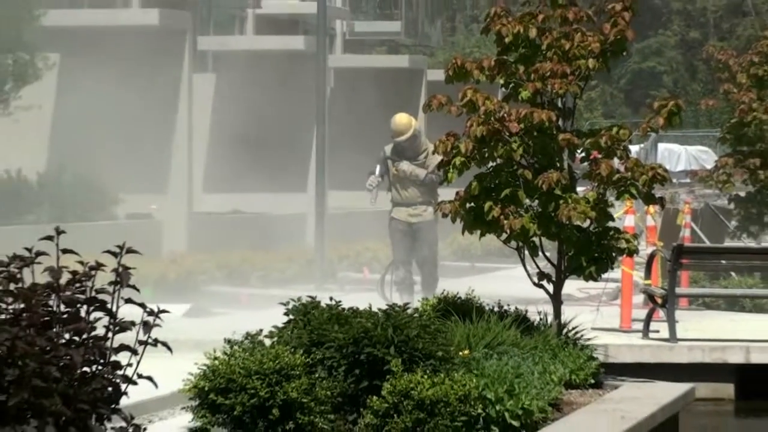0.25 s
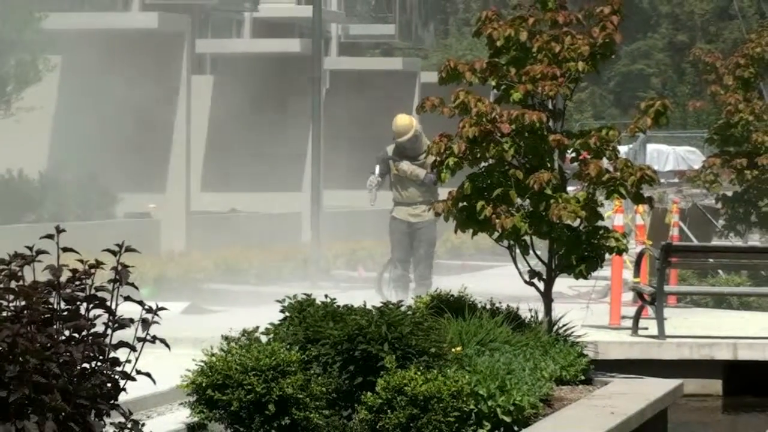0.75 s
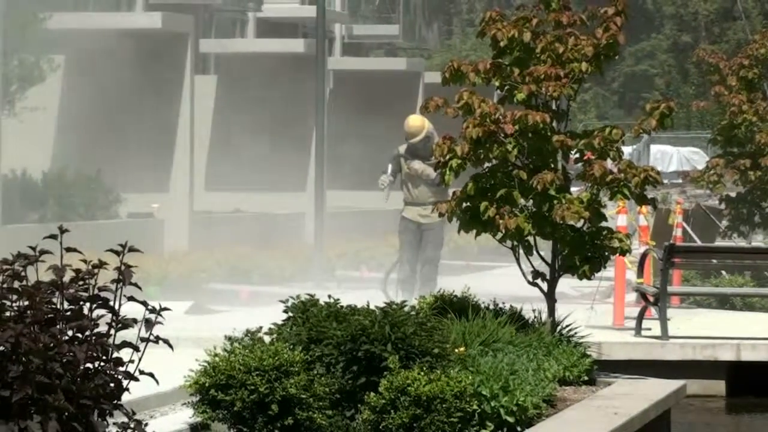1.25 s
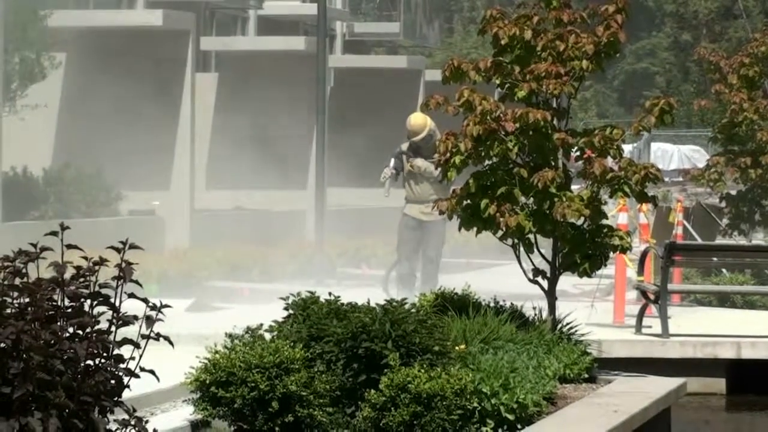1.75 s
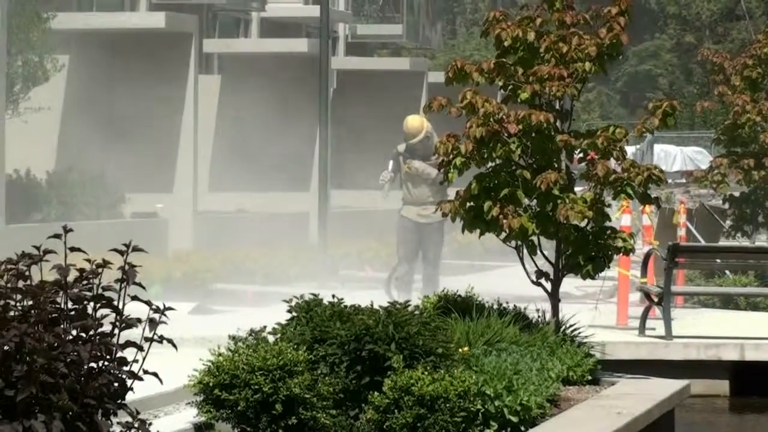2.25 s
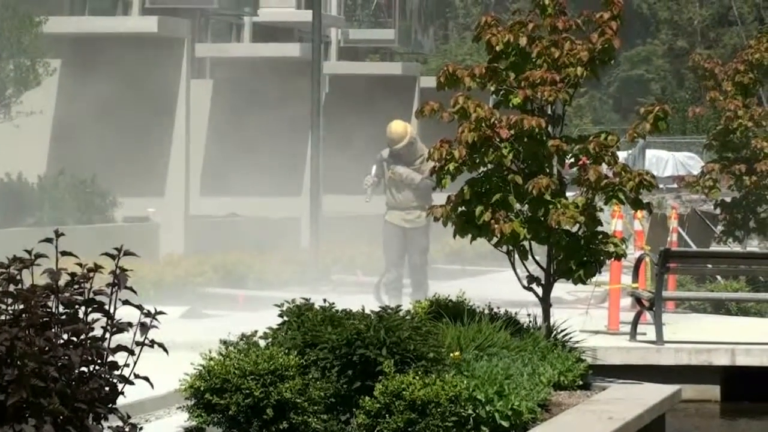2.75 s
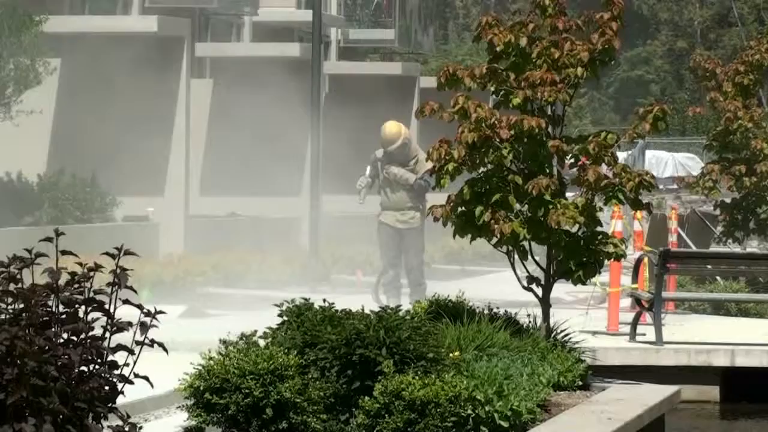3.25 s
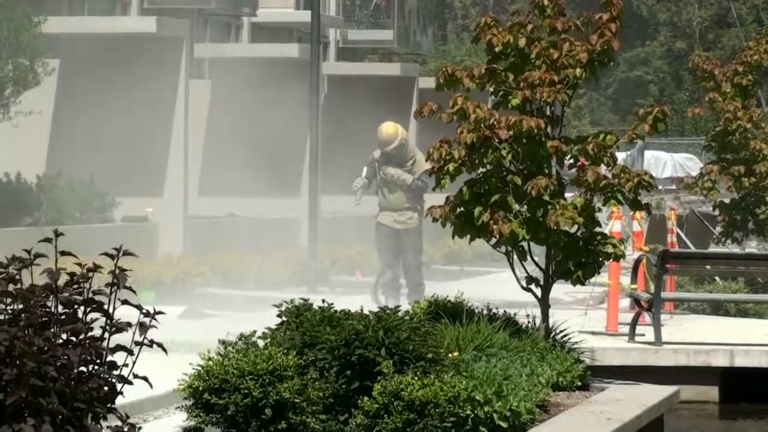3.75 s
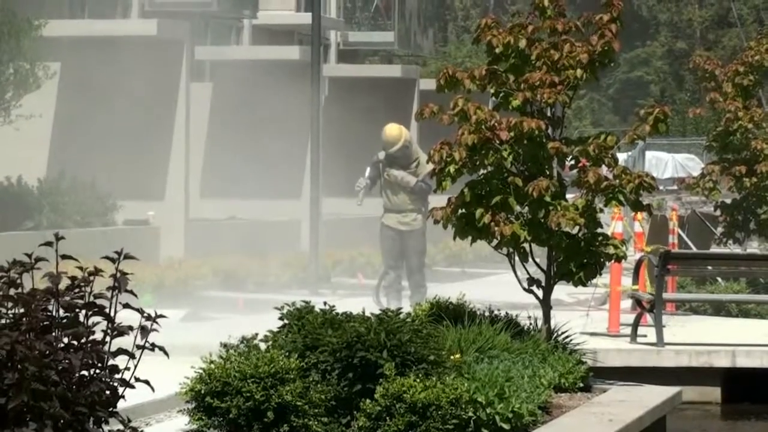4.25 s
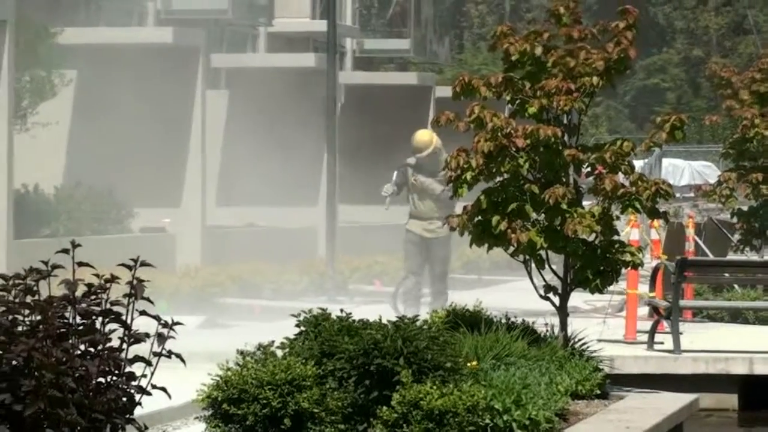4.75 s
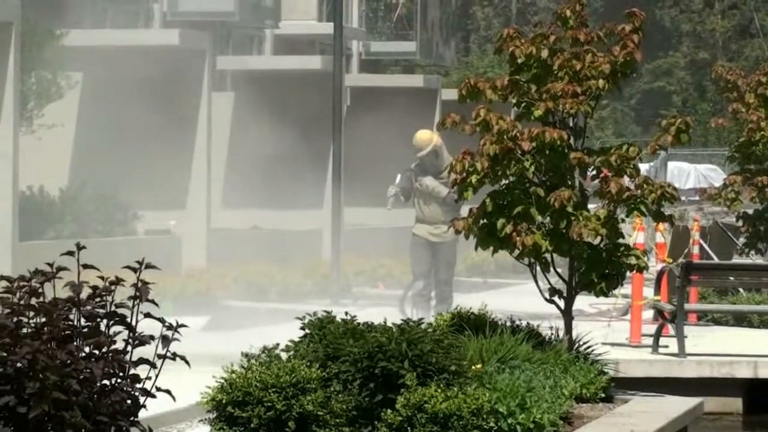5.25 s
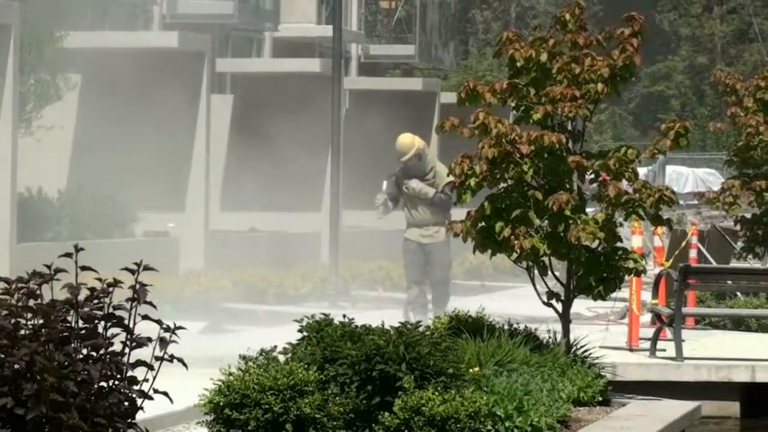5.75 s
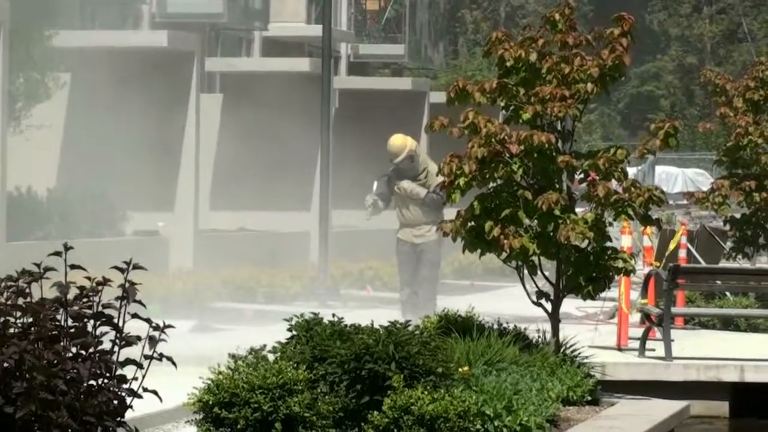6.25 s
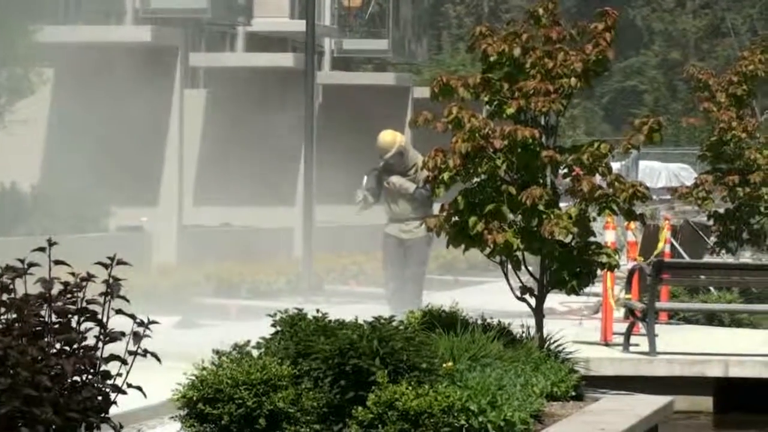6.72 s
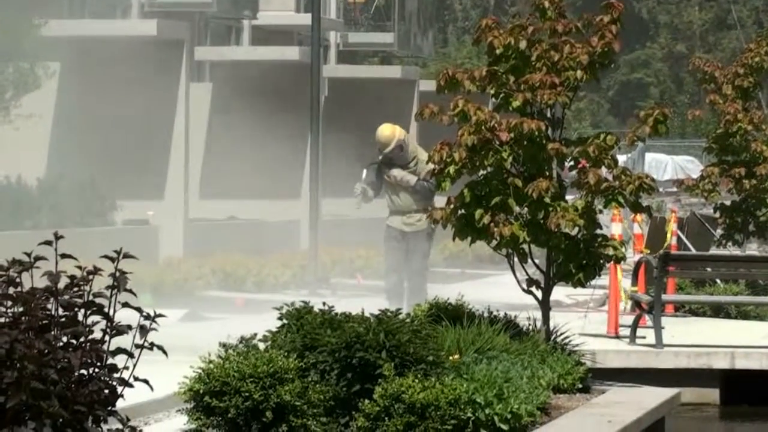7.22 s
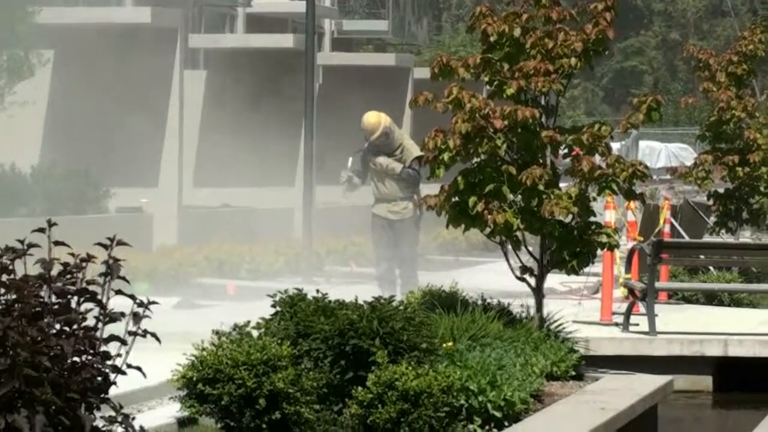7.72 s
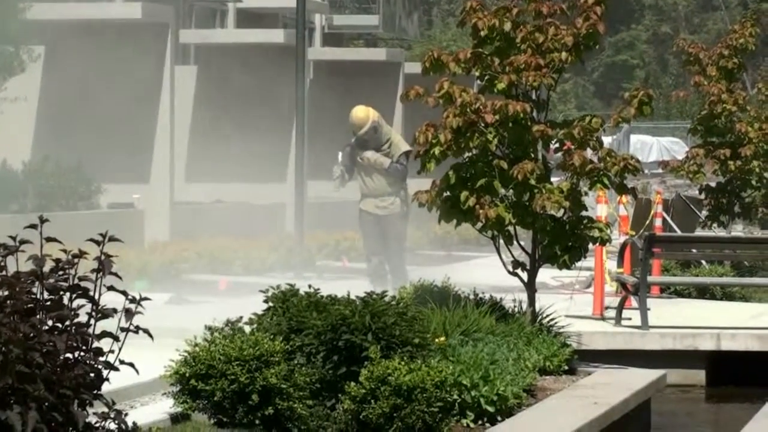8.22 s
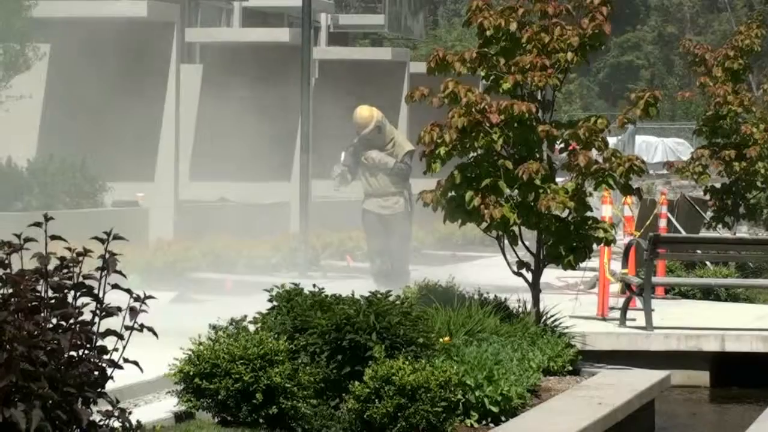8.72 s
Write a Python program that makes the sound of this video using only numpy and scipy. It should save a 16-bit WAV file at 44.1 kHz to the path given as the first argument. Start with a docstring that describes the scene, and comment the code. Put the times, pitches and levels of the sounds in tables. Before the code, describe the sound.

Continuous harsh hiss of compressed air and sand in a paved yard, fluttering slightly, with low traffic and compressor hum buried far underneath.

```python
"""From the start a blasting nozzle sprays sand on concrete in a paved yard: bands of noise make the air roar and the sand hiss.
As the nozzle swings toward the microphones the hiss brightens and the lower roar thins; short echoes are delayed copies.
Traffic rumbles as low noise and a compressor hums as a wavering sine, both throughout.
From about four seconds an engine revs up far off as two harmonics, joined by low tones that swell and fade
and two soft bumps of low noise."""
import sys
import numpy as np
from scipy import signal
from scipy.fft import rfft, irfft, next_fast_len
from scipy.io import wavfile
from scipy.ndimage import uniform_filter1d, map_coordinates

SR = 44100
rng = np.random.default_rng(int(sys.argv[2]) if len(sys.argv) > 2 else 0)


def unload_audio(sound):
    """Save the sound as a 16-bit wav file, at the path given as the first command line argument."""
    columns = np.transpose(np.atleast_2d(sound))
    # keep every value between -1 and 1, then stretch to whole-number steps
    steps = np.round(np.clip(columns, -1, 1) * 32767)
    wavfile.write(sys.argv[1], SR, steps.astype(np.int16))


N = 396018  # samples


def amp(db):
    """Decibel law: twenty decibels for each factor of ten in amplitude."""
    return 10 ** (np.asarray(db) / 20)


def unit(x):
    """Normalisation to a root mean square of 1."""
    return x / np.sqrt(np.mean(x ** 2) + 1e-20)


def along(points, hz):
    """Linear interpolation of (Hz, value) points on a logarithmic frequency axis."""
    f, v = np.transpose(points)
    return np.interp(np.log(hz + 1), np.log(f + 1), v)


def curves(rows):
    """Linear interpolation in time: one value per sample for each column after the time."""
    s, *columns = np.transpose(rows)
    t = np.arange(N) / SR
    return [np.interp(t, s, column) for column in columns]


def wobble(rate):
    """Band-limited random modulation: a smooth curve through random knots, rate of them a second."""
    knots = rng.standard_normal(int(N * rate / SR) + 4)
    return map_coordinates(knots, [np.arange(N) * rate / SR])


def filtered(x, response):
    """Linear filtering: the spectrum of x times a complex response of frequency."""
    m = next_fast_len(N + 8192)
    return irfft(rfft(x, m) * response(np.fft.rfftfreq(m, 1 / SR)), m)[..., :N]


def patches(shape, db, tall, long):
    """Random intensity fluctuation: a gain field smoothed over tall frequency bins and long frames."""
    field = rng.standard_normal(shape)
    field = uniform_filter1d(field, size=tall, axis=0)
    field = uniform_filter1d(field, size=long, axis=1)
    return amp(db * unit(field))


# Coherence of the two ports where direct and scattered levels agree.
# Each row: frequency in Hz, left-right likeness (0 to 1).
LIKENESS = [(25, 0.77), (60, 0.94), (130, 0.968), (290, 0.95), (640, 0.876), (1400, 0.85), (2100, 0.94),
            (3100, 0.83), (6800, 0.83), (11200, 0.79), (11400, 0.94), (11700, 1), (15000, 1)]


def rush(layers, patchy_db, comb_db, size):
    """Incoherent sources add in power: layers of (spectrum, direct dB, scattered dB) shape two independent noises."""
    hz, t, noise = signal.stft(rng.standard_normal((2, N)), SR, nperseg=size)
    at = np.clip((t * SR).astype(int), 0, N - 1)
    power = 0
    for spectrum, *db in layers:
        shape = unit(amp(along(spectrum, hz)))[:, None]
        power = power + shape ** 2 * amp(np.array(db)[:, None, at]) ** 2
    # the scattered part enters the ports with opposite signs, so this angle sets their likeness
    turn = np.arccos(np.clip(along(LIKENESS, hz), 0, 1)) / 2
    shares = np.array([np.cos(turn), np.sin(turn)])[..., None]
    eddies = patches(noise.shape[1:], patchy_db, tall=10, long=3)
    # interference from far walls: narrow, long-lasting ridges
    ridges = patches(noise.shape[1:], comb_db, tall=1, long=24)
    shaped = noise * np.sqrt(power) * shares * eddies * ridges
    return signal.istft(shaped, SR, nperseg=size)[1][:, :N]


# Early reflections from paving and walls. Each row: delay in seconds, low-frequency level in dB re the direct sound.
REFLECTIONS = [(.0013, -27.5), (.00156, -27.5), (.0022, -26.5), (.0042, -28.5), (.0064, -24.5)]


def yard(x):
    """Early reflection: weak copies arrive milliseconds late, their treble scattered away by rough faces."""
    def response(hz):
        dull = 1 / (1 + (hz / 2500) ** 2)
        copies = sum(amp(db) * np.exp(-2j * np.pi * hz * s) for s, db in REFLECTIONS)
        return 1 + dull * copies
    return filtered(x, response)


# Strength of jet and sand. Each row: time in seconds, air roar level in dB, sand hiss level in dB.
BLAST_LEVELS = [(0.0, -24.25, -23.75), (0.12, -23.5, -22.75), (0.25, -22.75, -26.5), (0.38, -23.0, -23.75),
                (1.12, -23.0, -27.0), (1.25, -21.25, -24.5), (1.38, -25.25, -22.75), (1.88, -24.0, -24.0),
                (2.0, -24.0, -22.25), (2.12, -24.25, -24.75), (2.25, -24.5, -22.25), (2.75, -23.0, -23.5),
                (2.88, -24.0, -22.5), (3.12, -23.0, -24.5), (3.25, -24.25, -22.0), (3.5, -26.0, -21.75),
                (4.62, -24.5, -22.5), (5.12, -23.0, -26.75), (5.25, -22.75, -23.5), (5.62, -25.25, -22.0),
                (5.75, -24.25, -23.0), (6.75, -23.0, -25.75), (7.62, -23.75, -26.0), (7.75, -26.5, -24.5),
                (7.88, -24.25, -25.0), (8.25, -24.75, -26.25), (8.38, -24.5, -24.5), (8.98, -24.25, -26.0)]
# Slow part of two layers' levels. Each row: time in seconds, nozzle ring in dB, upper roar in dB.
SLOW_LEVELS = [(0.0, -24.5, -26.5), (0.5, -23.25, -23.5), (1.75, -25.0, -24.5), (2.0, -23.75, -23.5),
               (3.0, -26.5, -26.0), (3.5, -23.25, -24.5), (4.0, -26.25, -24.75), (4.75, -25.5, -23.25),
               (5.25, -25.0, -23.25), (6.75, -25.75, -25.0), (8.98, -24.0, -24.5)]
# Swing of the treble beam between the ports. Each row: time in seconds, left-right difference in dB.
BEAM_SWING = [(0.0, 0.7), (0.75, -0.3), (1.25, 0.4), (2.25, -0.1), (5.25, 0.9), (6.5, 0.1), (7.0, 0.6),
              (7.75, -1.3), (8.98, -1.5)]
# Spectral shapes of the low roar, air roar, nozzle ring, upper roar and sand hiss.
# Each row: frequency in Hz, relative density in dB per Hz.
LOW_SHAPE = [(400, -38), (540, -23.5), (600, -8), (650, -3.5), (860, -3.5), (920, -5), (1200, 0.5),
             (1300, -0.5), (1500, -1.5), (2200, -26)]
ROAR_SHAPE = [(900, -37), (1400, -15.5), (1700, -7), (2200, -5), (2750, -1.5), (2950, -2), (3200, -2),
              (3600, -2), (4100, -4.5), (4600, -39), (5500, -51)]
RING_SHAPE = [(3300, -31), (4100, -5.5), (4500, -0.5), (4800, -3), (5100, -2), (5500, -8.5), (6000, -17.5),
              (7000, -40)]
UPPER_SHAPE = [(4500, -40), (5500, -2.5), (6000, -3), (6300, -2), (7100, -2.5), (7400, -5), (8000, -12),
               (9500, -33)]
SAND_SHAPE = [(6000, -43.5), (7400, -4), (8200, -0.5), (9300, -2), (9600, -2), (11100, -3.5), (11400, -2.5),
              (12600, -5.5), (12900, -11), (13200, -8.5), (13600, -10.5), (14000, -11), (14500, -25),
              (15300, -23), (15750, -32)]
LOW_DB = -36.9  # mean level of the low roar, before drift
LOW_JET, RING_JET, UPPER_JET = .35, .2, .5  # dB gained per dB of air roar
LOW_AIM, RING_AIM, UPPER_AIM = -.65, -.5, .15  # dB gained per dB of sand hiss
DRIFT_DB, DRIFT_PER_S = .45, 5  # separate wander of the low, ring and upper layers: depth, knots a second


def nozzle():
    """Turbulent jet noise roars, countless grain impacts merge into hiss, and uneven sand feed makes both flutter."""
    roar, sand = curves(BLAST_LEVELS)
    ring, upper = curves(SLOW_LEVELS)
    jet = roar - roar.mean()
    aim = sand - sand.mean()

    def drift():
        """Independent modulation: a slow random wander in dB."""
        return DRIFT_DB * wobble(DRIFT_PER_S)

    low = LOW_DB + LOW_JET * jet + LOW_AIM * aim + drift()
    ring = ring + RING_JET * jet + RING_AIM * aim + drift()
    upper = upper + UPPER_JET * jet + UPPER_AIM * aim + drift()
    feed = wobble(14)

    def calm(db, share, tie):
        """Directivity: treble leaves as a beam, so its scatter follows the aim less and the low roar more."""
        return db.mean() + share * (db - db.mean()) + tie * (low - low.mean())

    layers = [(LOW_SHAPE, low, low),
              (ROAR_SHAPE, roar, calm(roar, share=.62, tie=.3)),
              (RING_SHAPE, ring, calm(ring, share=.7, tie=.3)),
              (UPPER_SHAPE, upper, calm(upper, share=.4, tie=.4)),
              (SAND_SHAPE, sand + .47 * wobble(16), calm(sand, share=.4, tie=.4))]
    blast = rush(layers, patchy_db=.4, comb_db=1.9, size=2048)
    flutter = amp(.3 * feed + .25 * wobble(7))
    direct, scattered = flutter * blast
    # the beam swings between the two ports
    treble = filtered(direct, lambda hz: np.clip((hz - 3600) / 1800, 0, 1) * (hz < 11500))
    pan = np.tanh(curves(BEAM_SWING)[0] * np.log(10) / 40)  # dB difference to side share
    side = scattered + treble * pan
    return yard(np.array([direct + side, direct - side]))


# Course of the traffic. Each row: time in seconds, rumble level in dB.
TRAFFIC_LEVELS = [(0, -47.5), (.5, -49.5), (1.6, -51.5), (3, -50.8), (3.5, -52), (5.2, -49.3), (5.55, -52),
                  (7.25, -46.5), (7.8, -47.8), (8.98, -46.3)]
# Spectral shapes of the rumble, the deep rumble and the tyres.
# Each row: frequency in Hz, relative density in dB per Hz.
RUMBLE_SHAPE = [(90, -27), (160, 0), (220, -1), (300, 0.5), (370, -1), (430, -8), (600, -51.5)]
DEEP_SHAPE = [(15, -30), (30, -11), (50, -15), (80, 1.5), (130, -2.5), (200, -14), (300, -45)]
TYRE_SHAPE = [(330, -30), (440, -6.5), (500, -0.5), (560, -0.5), (620, -5.5), (800, -36)]
DEEP_DB, TYRE_DB = -10.5, -5  # dB re the mean rumble
DEEP_GROWS, TYRE_GROWS = 1.3, 1.3  # dB per dB of rumble swell


def traffic():
    """Superposition of many far sources: tyres and exhausts blend into slow rumbles that swell together."""
    rumble, = curves(TRAFFIC_LEVELS)
    mean = rumble.mean()
    swell = rumble - mean
    deep = mean + DEEP_DB + DEEP_GROWS * swell + 1.5 * wobble(3)
    tyres = mean + TYRE_DB + TYRE_GROWS * swell
    layers = [(RUMBLE_SHAPE, rumble, rumble), (DEEP_SHAPE, deep, deep), (TYRE_SHAPE, tyres, tyres)]
    noise = rush(layers, patchy_db=.5, comb_db=1.6, size=4096)
    direct, scattered = amp(.59 * wobble(9)) * noise
    return np.array([direct + scattered, direct - scattered])


# Compressor tone. Each row: mean frequency in Hz, level in dB before a fixed lift.
HUM_TONE = [(59.2, -60.5)]


def compressor():
    """Periodic vibration radiates a hum: one sine with slight amplitude and frequency modulation."""
    hz, db = HUM_TONE[0]
    level = amp(db + 2.5 + 1.2 * wobble(4))
    phase = 2 * np.pi * np.cumsum(hz + .35 * wobble(3)) / SR
    return level * np.sin(phase)


# Revving engine. Each row: time in seconds, firing rate in Hz, first-order level in dB and
# second-order level in dB, both before fixed lifts.
ENGINE_COURSE = [(4.2, 70, -74, -75), (4.8, 75, -64, -70), (5.3, 79.33, -65, -68), (5.9, 82.16, -70, -62),
                 (6.6, 85.8, -60, -66), (7.2, 91.2, -57, -58), (7.7, 96.14, -60, -66),
                 (8.2, 98.5, -66, -64), (8.6, 99.35, -62, -55), (8.98, 100.1, -62, -58)]


def engine():
    """Harmonic series of periodic firing: the first two orders climb together in pitch."""
    rate_hz, first_db, second_db = curves(ENGINE_COURSE)
    turn = 2 * np.pi * np.cumsum(rate_hz + .6 * wobble(6)) / SR
    # fades in over the 0.3 s before the first row
    fade = np.clip((np.arange(N) / SR - ENGINE_COURSE[0][0]) / .3 + 1, 0, 1)
    orders = amp(first_db + 4) * np.sin(turn) + amp(second_db + 3) * np.sin(2 * turn)
    return fade * amp(1.2 * wobble(8.8)) * orders


# Short tones. Each row: centre in seconds, mean pitch in Hz, rms level at the centre in dB,
# Gaussian half length in seconds, width of the pitch wander in Hz.
BOOM_TONES = [(4.27, 305, -44, .012, 60), (4.36, 293, -45, .035, 6.4), (4.36, 588, -50, .03, 10),
              (4.673, 297, -49, 0.018, 10.3), (6.948, 548, -45.5, .025, 20), (7.044, 523, -47, .025, 20),
              (7.16, 496, -44, .03, 20), (7.27, 290, -46.5, .025, 8), (7.301, 560, -49, .03, 27.8),
              (7.54, 117, -47, .07, 4.65), (8.83, 117, -46, 0.051, 4), (8.93, 155, -44.5, .04, 4)]


def booms():
    """Frequency-modulated tone bursts: Gaussian envelopes swell and fade over a slightly unsteady pitch."""
    out, t = np.zeros(N), np.arange(N) / SR
    for s, hz, db, half, width_hz in BOOM_TONES:
        swell = np.exp(-((t - s) / half) ** 2 / 2)
        phase = 2 * np.pi * np.cumsum(hz + width_hz / 2 * wobble(25)) / SR
        out += np.sqrt(2) * amp(db) * swell * np.sin(phase)
    return out


# Dull bumps. Each row: centre in seconds, rms level at the centre in dB, Gaussian half length in seconds.
BUMPS = [(4.28, -44, .02), (4.36, -47, .04)]
# Spectral shape of the bumps. Each row: frequency in Hz, relative density in dB per Hz.
BUMP_SHAPE = [(120, -30), (190, -3), (300, 0), (400, -2), (480, -14), (700, -40)]


def thuds():
    """Band-limited noise bursts: Gaussian puffs of low noise sound as soft dull bumps."""
    t = np.arange(N) / SR
    swell = sum(amp(db) * np.exp(-((t - s) / half) ** 2 / 2) for s, db, half in BUMPS)
    noise = filtered(rng.standard_normal(N), lambda hz: amp(along(BUMP_SHAPE, hz)))
    return swell * unit(noise)


def scene():
    """Superposition, with an arrival-time difference: machines to one side reach the right port 26 samples later."""
    machines = compressor() + engine()
    late = np.pad(machines, (26, 0))[:N]
    return nozzle() + traffic() + np.array([machines, late]) + booms() + thuds()


# Level balance of the ports. Each row: frequency in Hz, left-right difference in dB.
PORT_BALANCE = [(60, 0), (400, -0.2), (900, -0.6), (1500, -0.5), (3200, 1.7), (4500, 0.5), (7500, -0.7),
                (9400, -0.5), (11000, -1), (11800, 0)]
# Phase of the ports. Each row: frequency in Hz, lead of the left port in radians.
PORT_LEAD = [(0, -0.021), (3190, 0.0082), (6030, -0.23), (9220, 0.012), (9560, -0.2), (11000, -0.3),
             (11500, -0.0), (15500, 0.0)]
TOP_HZ = 15750  # band limit


def record(dry):
    """Interchannel level and phase difference: each port takes half of it, and a band limit cuts the top."""
    half = np.array([[.5], [-.5]])

    def response(hz):
        gain = amp(half * along(PORT_BALANCE, hz))
        phase = np.exp(1j * half * along(PORT_LEAD, hz))
        return gain * phase * (hz < TOP_HZ)
    return filtered(dry, response)


dry = scene()
out = record(dry)
unload_audio(out)
```